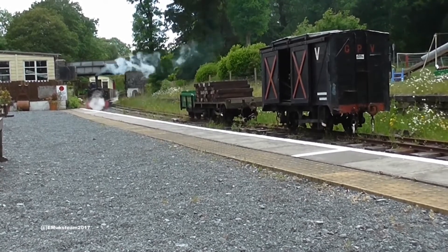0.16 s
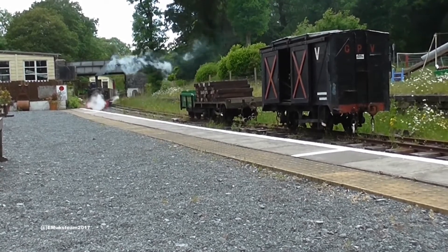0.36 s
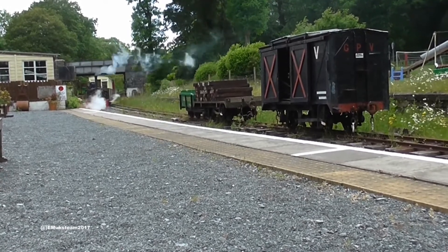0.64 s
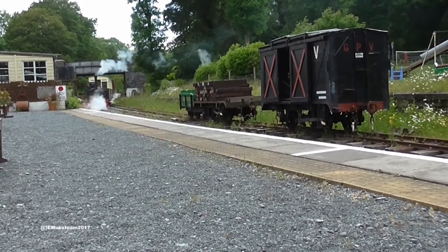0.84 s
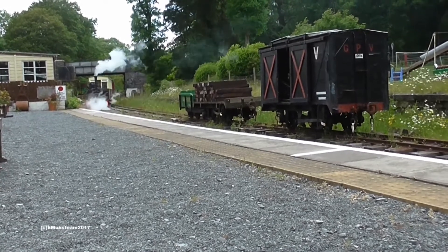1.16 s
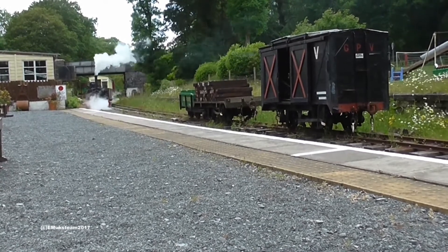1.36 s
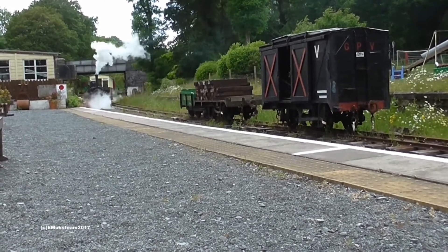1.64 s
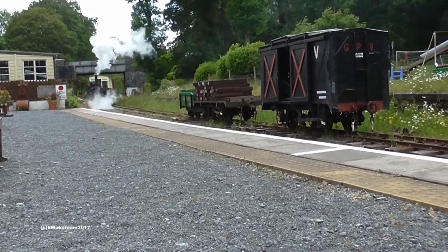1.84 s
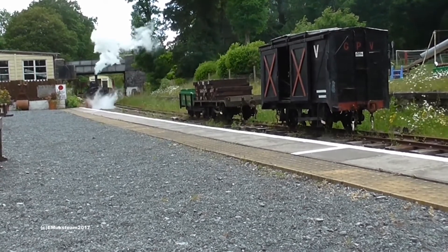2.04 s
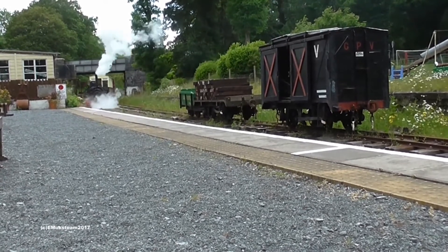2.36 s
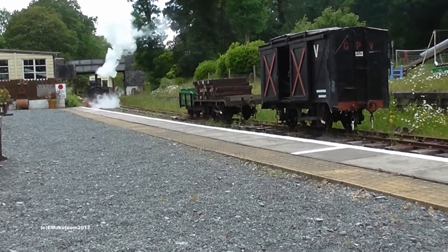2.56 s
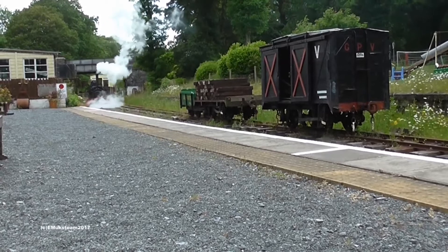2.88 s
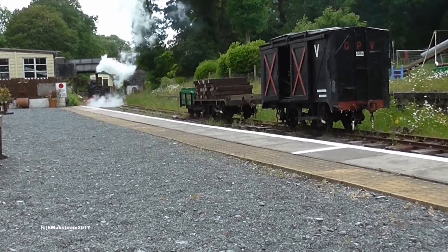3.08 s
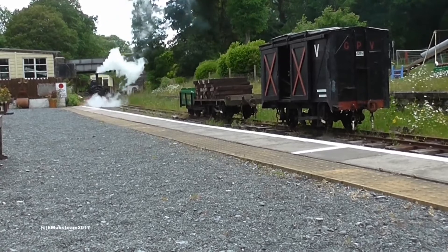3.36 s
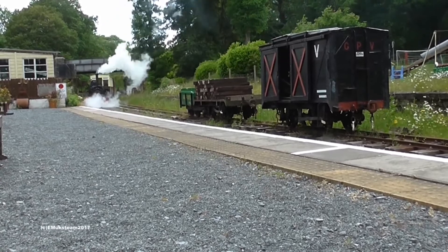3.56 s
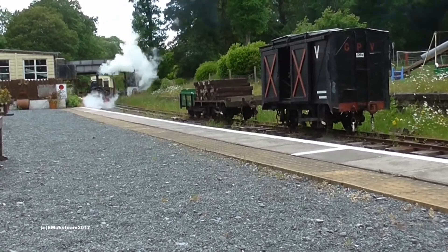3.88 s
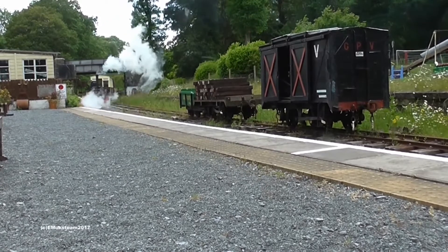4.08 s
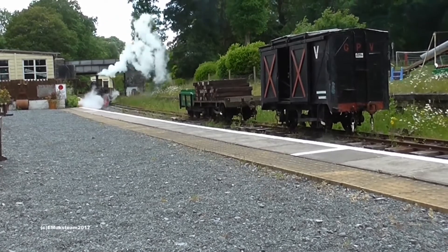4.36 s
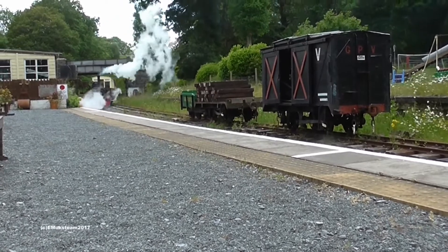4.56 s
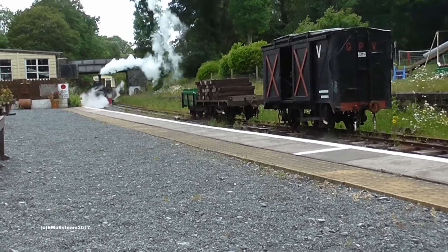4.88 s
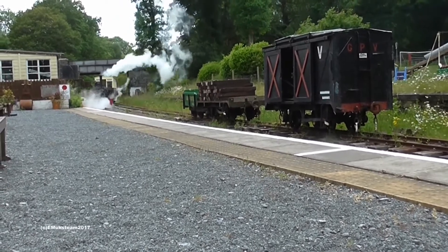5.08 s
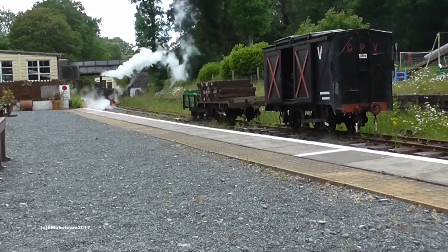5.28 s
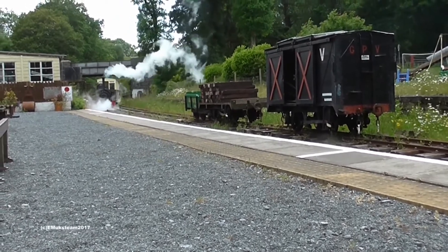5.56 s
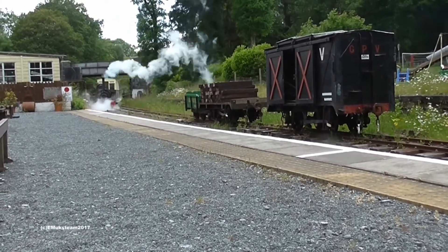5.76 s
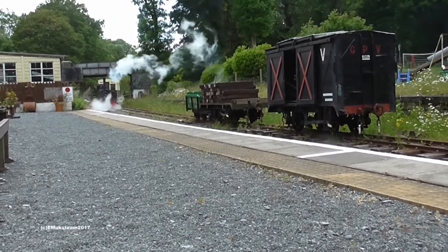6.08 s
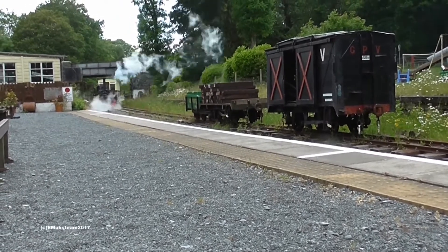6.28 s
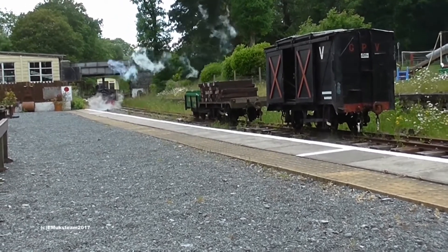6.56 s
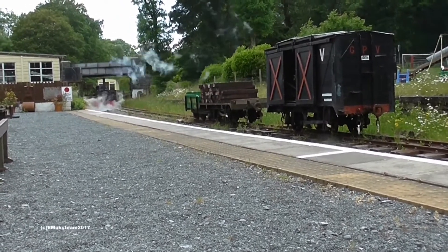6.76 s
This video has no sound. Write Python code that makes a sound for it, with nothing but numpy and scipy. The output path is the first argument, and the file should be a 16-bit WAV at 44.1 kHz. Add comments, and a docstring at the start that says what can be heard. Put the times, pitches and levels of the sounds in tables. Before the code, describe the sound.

A small steam locomotive stands far down an open-air station platform, heard through a stereo microphone exposed to the wind. From 0 to about 5.4 seconds it blows off steam: a continuous, bright but distant hiss, gently wavering, with brief narrow breathy tones singing out as air shifts the sound. Beneath it a low, hollow, noisy drone around 160 to 210 hertz rises and falls. From 0 to 1.3 seconds, heavy low wind thuds and lumpy rumbles strike the microphone, loudest near 0.25 and 0.9, stronger on the right. Wind then mostly calms, with small bumps around 4.1, 4.6 and 5.25. At about 5.45 the steam shuts off within a fraction of a second, its lower hiss trailing slightly. A soft, broad rush of leaves and leaking steam remains, with a low wind bump near 6.0 and a fluttering cluster from 6.5 to the end.

```python
"""Far down a station platform a small locomotive blows off steam until its valve shuts, heard at two microphone ports.
The jet is filtered noise that hisses and sings out in narrow swells; chimney resonances turn noise into a drone.
Gusty air bends the sound on its way, so bands of the hiss swell in turn.
Wind buffets the ports in opposite senses, as low lumpy noise and single eddies. Under it all, shaped noise makes
a broad distant rush of leaves and leaking steam."""
import sys
import numpy as np
from scipy import signal
from scipy.fft import rfft, irfft, next_fast_len
from scipy.io import wavfile
from scipy.ndimage import uniform_filter1d, map_coordinates

SR = 44100
rng = np.random.default_rng(int(sys.argv[2]) if len(sys.argv) > 2 else 0)


def file_out(sig):
    """Save sig as 16-bit WAV at sys.argv[1]."""
    # one column per channel
    cols = np.atleast_2d(sig).T
    # limit, then scale
    lim = np.clip(cols, -1, 1)
    pcm = np.round(lim * 32767).astype(np.int16)
    wavfile.write(sys.argv[1], SR, pcm)


N = 305613

# The jet as it arrives, before sway and flutter. Each row: time in seconds, level of the 4.6-7.5 kHz band in dB,
# treble above 7.5 kHz against that band in dB.
JET_COURSE = [(0.0, -34.5, 7), (0.09, -30, 1), (0.24, -31, 0.5), (0.42, -30, -4), (0.6, -29.5, -4.5),
              (0.82, -30, -3.5), (1.1, -30.5, -0.5), (1.44, -29, -3.5), (1.98, -28.5, -2.5),
              (2.26, -34, -2.5), (2.34, -30.5, -2.5), (3.09, -33, -2), (3.22, -29, -5), (3.73, -31.5, 1),
              (3.83, -27, -4), (3.94, -31, 4), (4.0, -29.5, -1), (4.16, -31, -2.5), (4.22, -31, 0),
              (4.28, -30.5, 0), (4.35, -31.5, 0), (4.62, -28, -4), (4.73, -37, -2.5), (4.82, -30.5, -0.5),
              (5.0, -31.5, -3), (5.22, -31.5, -4), (5.46, -32, -4.5)]
# Lower edges of the five hiss bands, in Hz; the last band is open above.
BAND_EDGES_HZ = [950, 1700, 3200, 4600, 7500]
# The three lower hiss bands. Each row: steady level in dB, share of the jet's swings (0-1).
LOWER_BANDS = [(-41.5, 0.22), (-33.5, 0.37), (-36, 0.37)]
# How fast each hiss band falls once the valve shuts, low to high, in dB per second.
BAND_FALL_DB_PER_S = [6.6, 69, 28.5, 43, 53]
# Colour of the steam noise within its bands. Each row: frequency in Hz, relative density in dB per Hz.
HISS_COLOUR = [(530, -44), (900, -3), (1060, -2.5), (1630, -8), (2170, -3), (2360, -5.5), (3210, -5),
               (6260, -9), (10100, -16), (14200, -31), (15500, -42)]
# Peaks and dips of the valve. Each row: centre in Hz, width in Hz, lift in dB.
VALVE_RESONANCES = [(1846, 60, 8), (2198, 94, 4), (2600, 240, 4), (3220, 200, -3.5), (4650, 570, -3),
                    (7830, 190, -5)]
# Likeness of the hiss at the two ports. Each row: frequency in Hz, left-right correlation (0-1).
HISS_LIKENESS = [(900, 0.94), (1400, 1), (2100, 1), (2750, 0.79), (3400, 1), (4500, 0.75), (6000, 0.86),
                 (7000, 0.9), (8600, 0.78), (11000, 0.66), (13000, 0.96)]
# Lean of the hiss to one side. Each row: frequency in Hz, left minus right in dB.
HISS_BALANCE = [(1400, 0), (2400, 0.9), (4400, 0.5), (6000, 2), (8600, -1), (15000, -0.2)]
# Moments when part of the hiss sings out or drops away. Each row: centre in seconds, spread in seconds,
# frequency in Hz, spread in Hz, lift in dB, glide in Hz per second.
HISS_SWELLS = [(0.1, 0.093, 6300, 150, 6, 0), (0.14, 0.086, 7000, 200, 6, 1),
               (0.39, 0.063, 3800, 70, 9, 400), (.33, .07, 3550, 150, 5, -2),
               (.35, .17, 5450, 100, 4.5, -300), (0.82, 0.14, 2900, 200, -6, 600),
               (1.09, 0.11, 5530, 100, 6.5, 0), (1.6, .1, 7350, 120, 4, -3), (0.83, 0.07, 2100, 50, 7, 0),
               (0.94, 0.035, 2220, 70, 14, 0), (1.3, .07, 2450, 70, 7, 0), (1.37, .025, 1900, 60, 8, 0),
               (0.99, 0.07, 2640, 60, 9, 0), (1.39, 0.05, 5570, 140, 7, 0), (1.8, 0.09, 8700, 500, 2.5, 0),
               (1.92, 0.054, 8000, 600, 1.5, 0), (2.7, 0.038, 9200, 500, 5, 2),
               (1.39, 0.18, 6680, 140, 7.5, 0), (1.44, 0.07, 2700, 73, 9, 600), (1.67, .06, 2700, 98, 6, 4),
               (1.663, 0.083, 2160, 65, 12.5, 0), (1.82, 0.1, 5050, 130, 6, -3),
               (1.8, .06, 4440, 130, 10, -2), (1.95, 0.14, 3780, 160, 6, 0), (2.11, 0.056, 4230, 130, 9, 0),
               (2.11, 0.13, 3450, 120, 9.5, 0), (2, .09, 2180, 90, 6, 0), (2.24, 0.045, 2220, 80, 9, 0),
               (1.85, 0.15, 2540, 120, 6, 500), (2.06, 0.11, 2720, 75, 8.5, 0),
               (2.22, 0.081, 2660, 90, 9.5, 0), (2.4, 0.054, 2600, 90, 2, 2), (2.47, 0.071, 2200, 72, 9, 0),
               (2.75, 0.096, 2670, 110, 9, 1000), (3.09, 0.11, 2430, 200, -4.5, 0),
               (3.23, 0.035, 3700, 93, 10, 0), (2.7, 0.054, 2200, 80, 3, 0), (3, 0.074, 5520, 120, 1, 0),
               (3.57, .13, 3050, 170, -3.5, 0), (3.66, 0.04, 1820, 60, 6, 0),
               (3.31, 0.069, 1870, 70, 6.5, 0), (3.7, 0.032, 2170, 50, 8, 0),
               (3.72, 0.047, 2000, 60, 7, 1500), (3.82, 0.045, 2200, 55, 7, 0),
               (3.83, 0.055, 5380, 130, 9.5, -1500), (4.4, .09, 5350, 110, 7, 500),
               (3.86, 0.047, 6230, 140, 9.5, 2500), (3.65, .04, 5550, 90, 9, 0),
               (3.3, .025, 6900, 150, 6, 0), (3.92, .025, 8200, 500, 4, 0), (3.87, .035, 2370, 80, 7, 3500),
               (3.925, 0.035, 2640, 70, 13.5, 500), (3.94, 0.045, 9650, 170, 9, 3500),
               (4.05, 0.071, 2820, 160, 6.5, 0), (4.12, 0.17, 3100, 150, 8.5, -2),
               (4.23, 0.075, 2670, 140, 10, 0), (4.03, 0.08, 2170, 40, 5, 0), (4.2, .035, 3060, 60, 5, 0),
               (3.7, 0.084, 1670, 150, -4, 0), (4.07, .05, 4060, 130, 8, -2), (4.32, .05, 2210, 87, 10, 0),
               (4.78, 0.086, 2200, 180, 10.5, -600), (4.93, 0.044, 1950, 90, 6.5, 0),
               (5.0, 0.083, 2600, 110, 6.5, 0), (4.98, 0.11, 3120, 200, 7.5, 0),
               (5.11, 0.044, 6050, 190, 10, 3500), (4.7, .04, 7200, 300, 4, 5000),
               (5.54, .06, 3000, 450, -10, 0), (5.57, 0.035, 9700, 2000, -2.5, 0),
               (5.3, 0.1, 2780, 190, 8.5, 800), (5.41, 0.036, 3300, 350, 8.5, 0)]
# The drone over time. Each row: time in seconds, level in dB, lift of the upper resonances in dB.
DRONE_COURSE = [(0, -35.5, -3), (.2, -24.5, -2), (.87, -31.5, -1), (1.1, -26.5, 0), (1.5, -31, -3.5),
                (1.8, -36.5, -5), (2.05, -34, -3), (2.35, -27.5, -4), (2.6, -28, 1), (2.85, -32, -2),
                (3.12, -27.5, 0.5), (3.3, -27.5, -1.5), (3.5, -31.5, 6), (3.65, -28.5, 2), (3.9, -33, 9),
                (4.05, -30.5, 2.5), (4.3, -32.5, 3), (4.7, -36, 6), (4.9, -29.5, 1), (5.15, -37.5, 2),
                (5.42, -33, 2)]
# Chimney resonances, the last two being the upper pair. Each row: centre in Hz, width in Hz, relative level in dB.
CHIMNEY_RESONANCES = [(87, 71, -19.5), (163.6, 23, -2.5), (180.1, 23, 0.5), (210, 42, -3.5), (260, 35, -15)]
# The distant rush over time. Each row: time in seconds, level in dB.
RUSH_COURSE = [(0.0, -35.5), (0.6, -33.5), (1.3, -35.5), (2.0, -39.5), (2.6, -38.5), (3.5, -37),
               (4.0, -41.5), (4.6, -36.5), (5.8, -35.5), (6.5, -35), (6.93, -35.5)]
# Colour of the rush. Each row: frequency in Hz, relative density in dB per Hz.
RUSH_COLOUR = [(30, -25), (70, -12), (120, -8.5), (180, -8), (263, -10), (320, -9.5), (708, -7), (830, -6),
               (1020, -14.5), (1400, -14.5), (1730, -13), (2810, -26), (4560, -21), (8980, -40),
               (15500, -50)]
# Likeness of the rush at the two ports. Each row: frequency in Hz, left-right correlation (0-1).
RUSH_LIKENESS = [(100, 0.78), (300, 1), (600, 0.93), (860, 0.79), (1900, 0.88), (4300, 0.65), (6000, 0.36),
                 (9000, 0.088)]
# Lean of the rush to one side. Each row: frequency in Hz, left minus right in dB.
RUSH_BALANCE = [(150, -4), (600, -3), (860, 0), (1300, -4), (3000, -2), (4300, 1), (9000, 1)]
# Force of the wind before its quick random swings. Each row: time in seconds, buffeting in dB.
WIND_COURSE = [(0.0, -30), (0.15, -24.5), (0.25, -19.5), (0.34, -28), (0.48, -23.5), (0.62, -30),
               (0.7, -21.5), (0.81, -26), (0.85, -22.5), (0.9, -21.5), (0.98, -27.5), (1.04, -24.5),
               (1.11, -26), (1.18, -22.5), (1.23, -29), (1.3, -38), (1.5, -46), (1.75, -50), (1.95, -34),
               (2.1, -47), (2.43, -42), (3.1, -50), (3.28, -36.5), (3.65, -43), (4.05, -39), (4.14, -28),
               (4.38, -41.5), (4.57, -31.5), (4.85, -45), (4.97, -32), (5.1, -53), (5.27, -25), (5.42, -37),
               (5.84, -58), (5.97, -44), (6.05, -33), (6.18, -31.5), (6.29, -37), (6.38, -43), (6.5, -29),
               (6.58, -33), (6.72, -26.5), (6.84, -29), (6.93, -26)]
# Colour of the buffeting in a middling wind. Each row: frequency in Hz, relative density in dB per Hz.
BUFFET_COLOUR = [(15, -27), (43, -2), (90, 3), (150, 2.5), (215, -6), (310, -8), (450, -15.5), (700, -28),
                 (1500, -50), (4000, -93)]
# Single eddies that strike the ports. Each row: time in seconds, level of the swing at the right port in dB,
# pitch in Hz, spread in cycles.
EDDIES = [(0.09, -13, 170, .8), (0.137, -10, 190, .8), (0.155, -11, 180, .8), (0.204, -10, 200, 0.57),
          (0.222, -9, 189, 0.94), (0.239, -15, 620, .9), (0.242, -5, 282, 0.54), (0.249, -1, 170, 0.46),
          (0.253, -8, 380, .5), (0.259, -4, 208, 0.57), (0.283, -8, 220, 0.58), (0.3, -10, 150, 0.66),
          (0.365, -10, 200, .6), (0.41, -6.5, 168, 0.69), (0.475, -8, 168, 0.49), (0.584, -10, 160, .7),
          (0.66, -15, 120, .5), (0.7, -12, 150, .7), (0.778, -10, 220, .5), (0.846, -8, 330, 0.63),
          (0.849, -16, 600, .9), (0.851, -4, 171, 0.46), (0.88, -7, 150, .7), (0.893, -6, 328, 0.57),
          (0.904, -3, 250, 0.56), (0.928, -9, 220, 0.55), (0.948, -9, 200, .6), (1.022, -10, 180, .8),
          (1.05, -7.5, 200, 0.77), (1.146, -8, 200, .6), (1.161, -10, 170, 0.54), (1.176, -18, 520, .9),
          (1.182, -10, 270, .6), (1.195, -10, 110, .6), (1.222, -13, 170, .9), (4.593, -13, 180, 0.5),
          (5.254, -12.5, 169, 0.72), (6.037, -9.5, 188, 1.1), (6.155, -21, 120, 0.92),
          (6.197, -19, 110.2, .9), (6.283, -20, 140, .9), (6.507, -21, 120, 0.52), (6.655, -17, 140, .7),
          (6.685, -16, 161, .9), (6.698, -17, 90, 0.5), (6.724, -9, 150, 0.41), (6.752, -17, 110, .6),
          (6.78, -16, 190, .8), (6.797, -14, 210, 1.1), (6.812, -18, 130, .8)]

SHUT_S = 5.448  # the valve shuts
SWAY_DB = 1.2  # how far each hiss band sways by itself
DRONE_FALL_DB_PER_S = 65  # once the valve shuts
EVENNESS = 0.85  # how far the noise's own slow level swings are evened out, so the drone follows its course, 0-1
GUSTY_DB = 1.6  # quick random swings of the wind
EDDY_LEFT = 0.29  # share of an eddy that reaches the left port, reversed
TOP_HZ = 15600  # band limit of the input stage


def amp(db):
    """Gain of a level in dB."""
    return 10 ** (np.asarray(db) / 20)


def unit(x):
    """Scaled so that the mean of the channels has rms 1."""
    return x / np.sqrt(np.mean(np.mean(np.atleast_2d(x), axis=0) ** 2))


def along(points, hz):
    """Value at each frequency, from (Hz, value) points joined on a log axis."""
    f, v = np.transpose(points)
    return np.interp(np.log(hz + 1), np.log(f + 1), v)


def curves(rows):
    """One value per sample for each column after the time."""
    s, *cols = np.transpose(rows)
    return [np.interp(np.arange(N) / SR, s, c) for c in cols]


def since(s):
    """Seconds gone by after a moment, 0 before it."""
    return np.maximum(np.arange(N) / SR - s, 0)


def wobble(rate):
    """A smooth random curve with rate knots a second."""
    knots = rng.standard_normal(int(N * rate / SR) + 8)
    return map_coordinates(knots, [np.arange(N) * rate / SR])


def filtered(x, response):
    """x times a response of frequency; the padding keeps its end from wrapping round to its start."""
    m = next_fast_len(N + 8192)
    spectrum = rfft(x, m) * response(np.fft.rfftfreq(m, 1 / SR))
    return irfft(spectrum, m)[..., :N]


def air(alike, lean, patchy_db, whistles=()):
    """White stereo noise with patches of random gain and given narrow swells, part shared by both sides."""
    hz, t, z = signal.stft(rng.standard_normal((2, N)), SR, nperseg=1024)
    hz = hz[:, None]
    field = rng.standard_normal(z.shape[1:])
    field = uniform_filter1d(uniform_filter1d(field, size=3, axis=0), size=9, axis=1)
    gain_db = patchy_db * (1 + hz / 7000) * field / field.std()  # deeper toward the treble
    for s, long, centre, wide, db, glide in whistles:
        off_pitch = (hz - centre - glide * (t - s)) / wide
        off_time = (t - s) / long
        gain_db += db * np.exp(-off_pitch ** 2 / 2 - off_time ** 2 / 2)
    pair = signal.istft(z * amp(gain_db), nperseg=1024)[1][:, :N]

    # The angle between mid and side sets how alike left and right are.
    turn = lambda hz: np.arccos(np.clip(along(alike, hz), -1, 1)) / 2
    mid, side = filtered(pair, lambda hz: np.array([np.cos(turn(hz)), np.sin(turn(hz))]))
    stereo = np.array([mid + side, mid - side])
    return filtered(stereo, lambda hz: amp(np.outer([.5, -.5], along(lean, hz))))


def jet():
    """Turbulent steam through the valve's resonances; each band sways alone on the way and dies at its own speed."""
    body_db, treble_db = curves(JET_COURSE)
    lift_db = lambda hz: sum(db / (1 + (2 * (hz - c) / w) ** 2) for c, w, db in VALVE_RESONANCES)
    steam = air(HISS_LIKENESS, HISS_BALANCE, patchy_db=.75, whistles=HISS_SWELLS)
    steam = filtered(steam, lambda hz: amp(along(HISS_COLOUR, hz) + lift_db(hz)))

    swing_db = body_db - body_db.mean()
    levels_db = [db + share * swing_db for db, share in LOWER_BANDS]
    levels_db.append(body_db)
    levels_db.append(body_db + treble_db + 0.95 * wobble(23.79))  # moving air shakes the shortest waves most

    above = lambda hz, edge: 1 / (1 + (edge / (hz + 1)) ** 16)
    upper_edges = BAND_EDGES_HZ[1:] + [SR]
    out = np.zeros((2, N))
    for db, fall, lo, hi in zip(levels_db, BAND_FALL_DB_PER_S, BAND_EDGES_HZ, upper_edges):
        band = unit(filtered(steam, lambda hz: above(hz, lo) - above(hz, hi)))
        out += amp(db + SWAY_DB * wobble(5.0) - fall * since(SHUT_S)) * band
    flutter_db = 0.14 * wobble(9) + 0.51 * wobble(18)  # the flow is never quite even
    return amp(flutter_db) * out


def drone():
    """Noise rings in the chimney's lowest, steep-flanked resonances; the upper pair swells against the lower ones."""
    pipe = lambda hz, modes: sum(amp(db) / (1 + (2 * (hz - c) / w) ** 2) ** 1.36 for c, w, db in modes)
    noise = air([(180, .9)], [(180, -4)], patchy_db=.6)
    level_db, upper_db = curves(DRONE_COURSE)
    lower = filtered(noise, lambda hz: pipe(hz, CHIMNEY_RESONANCES[:-2]))
    upper = filtered(noise, lambda hz: pipe(hz, CHIMNEY_RESONANCES[-2:]))
    ring = lower + amp(upper_db) * upper
    slow_power = np.abs(uniform_filter1d(ring.mean(axis=0) ** 2, size=7000))
    ring = ring * slow_power ** (-EVENNESS / 2)
    return amp(level_db - DRONE_FALL_DB_PER_S * since(SHUT_S)) * unit(ring)


def rush():
    """A broad far rush of leaves and leaking steam: noise with one fixed colour and a slowly changing level."""
    noise = air(RUSH_LIKENESS, RUSH_BALANCE, patchy_db=1.0)
    noise = filtered(noise, lambda hz: amp(along(RUSH_COLOUR, hz)))
    return amp(curves(RUSH_COURSE)[0]) * unit(noise)


def wind():
    """Lumpy pressure on the windward right port; the left port gets part of it reversed, and its own."""
    lumps = amp(0.8 * np.array([wobble(30), wobble(27)]))
    buffet = filtered(lumps * rng.standard_normal((2, N)), lambda hz: amp(along(BUFFET_COLOUR, hz)))
    buffet /= buffet.std()
    force_db = curves(WIND_COURSE)[0] + GUSTY_DB * wobble(13)
    upper = filtered(buffet, lambda hz: hz ** 4 / (hz ** 4 + 240 ** 4))
    brightness = amp(0.44 * (force_db + 43.5))  # stronger gusts are brighter
    shared, own = amp(force_db) * (buffet + (brightness - 1) * upper)

    eddies = np.zeros(N)
    t = np.arange(-600, 600) / SR
    phases = rng.uniform(0, 2 * np.pi, len(EDDIES))
    for (s, db, hz, cycles), phase in zip(EDDIES, phases):
        eddy = np.exp(-(t * hz / cycles) ** 2) * np.cos(2 * np.pi * hz * t + phase)  # a short swing of pressure
        eddy += 0.36 * np.sign(np.cos(phase)) * np.exp(-np.abs(t) / 0.00062)  # a sharp edge where it lands
        at = round(s * SR) - 600
        eddies[at:at + len(t)] += amp(db) * eddy

    # Share of the right port's buffeting that reaches the left, by frequency in Hz.
    share = lambda hz: np.clip(along([(40, 0.15), (120, 0.32), (300, 0.68), (700, 0.25)], hz), 0, 1)
    left = filtered(own, lambda hz: np.sqrt(1 - share(hz) ** 2)) - filtered(shared, share)
    return np.array([amp(-4.0) * left - EDDY_LEFT * eddies, shared + eddies])


def scene():
    """All sources at the two microphone ports, left and right."""
    return jet() + drone() + rush() + wind()


def record(dry):
    """The input stage rounds off the hardest buffets; nothing is kept above the band limit."""
    soft = dry / (1 + np.abs(dry / .85) ** 4) ** (1 / 4)
    return filtered(soft, lambda hz: hz < TOP_HZ)


dry = scene()
out = record(dry)
file_out(out)
```